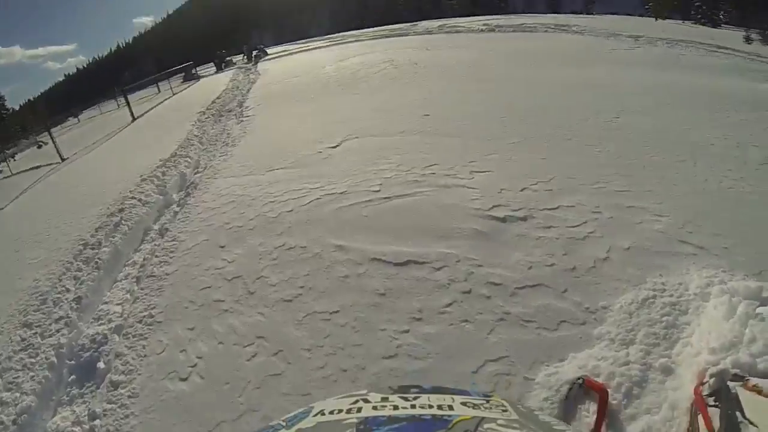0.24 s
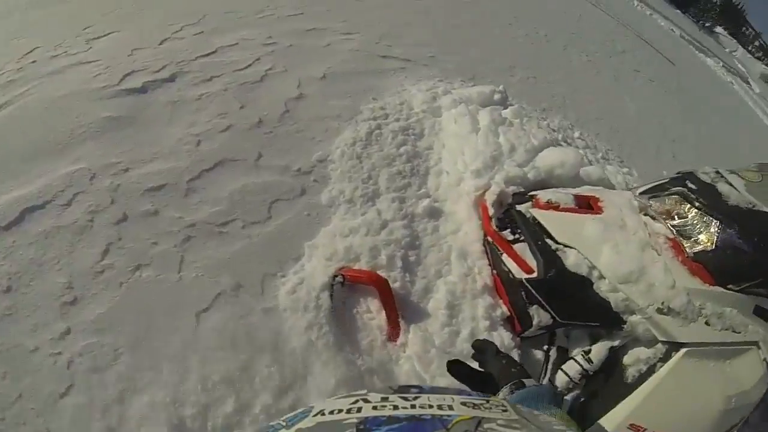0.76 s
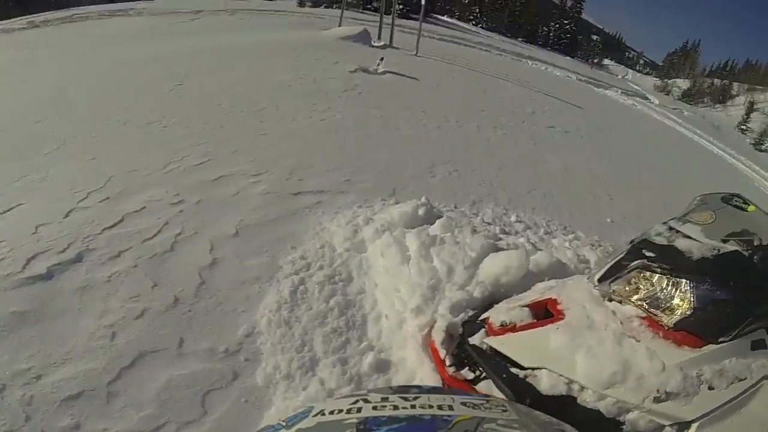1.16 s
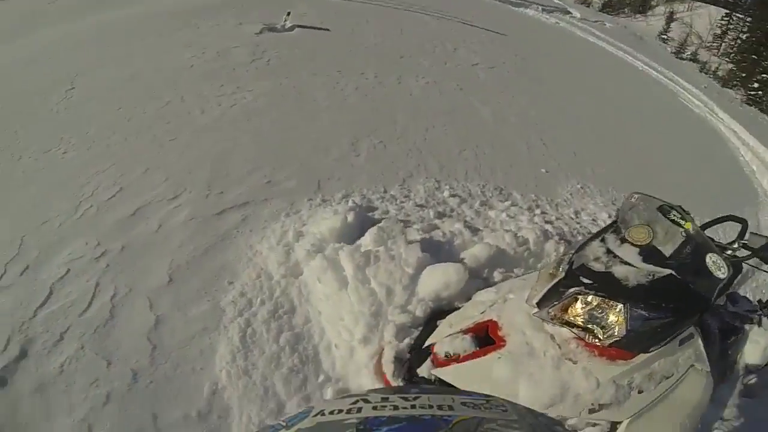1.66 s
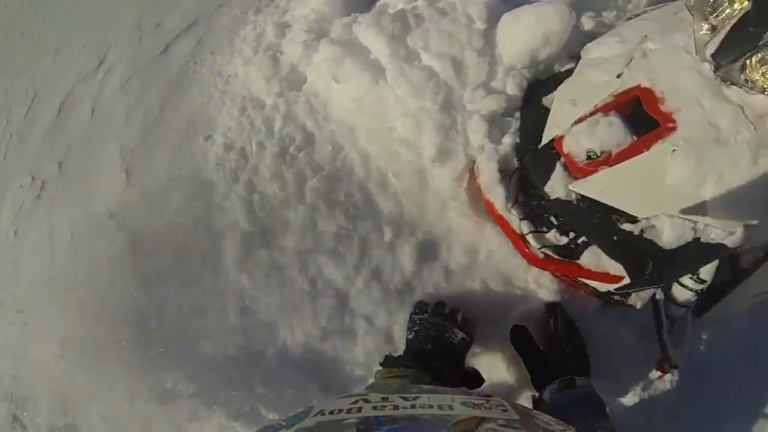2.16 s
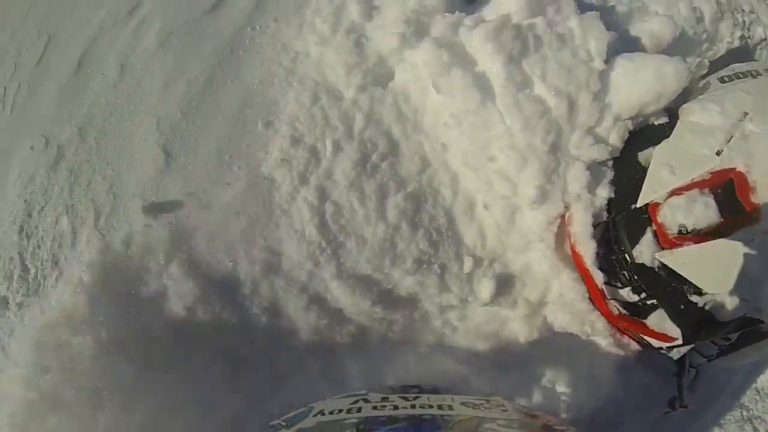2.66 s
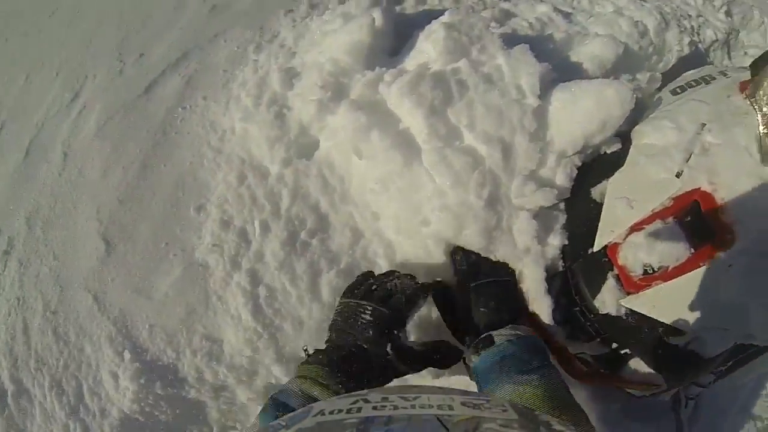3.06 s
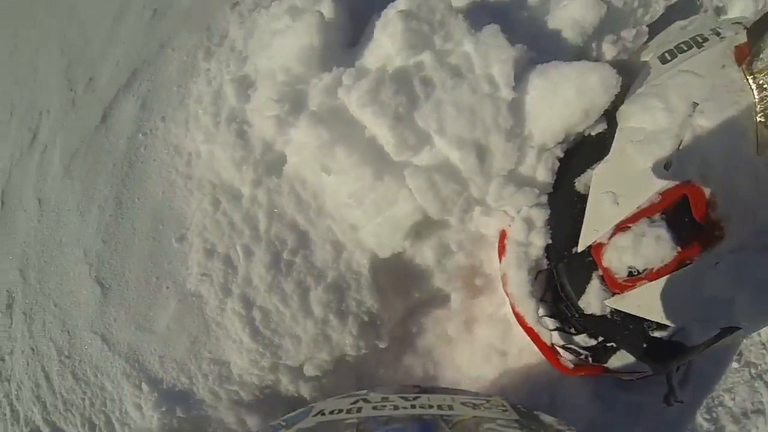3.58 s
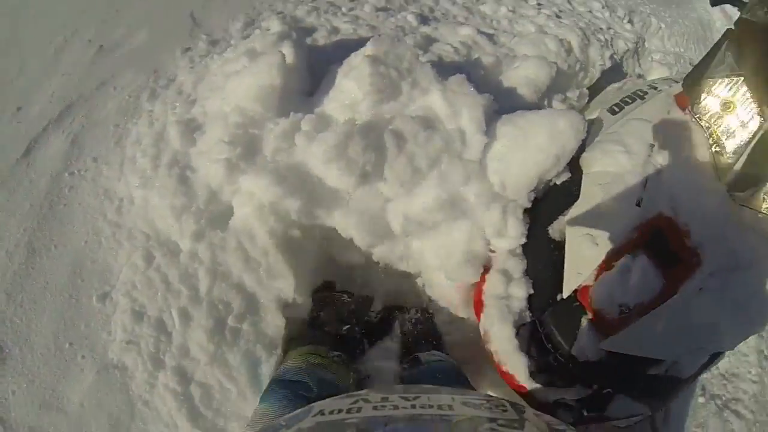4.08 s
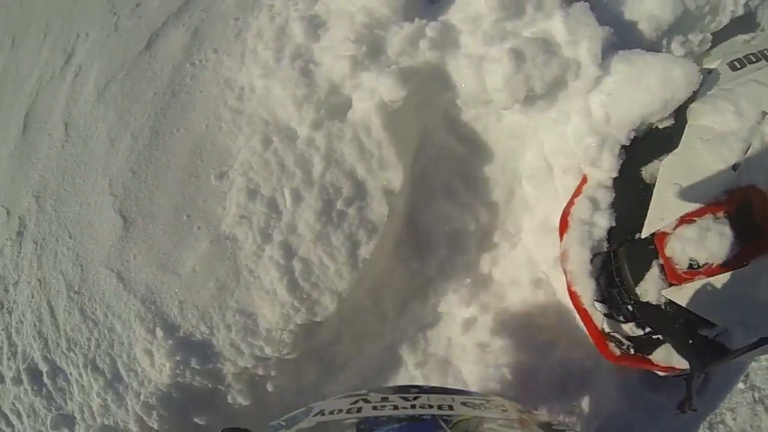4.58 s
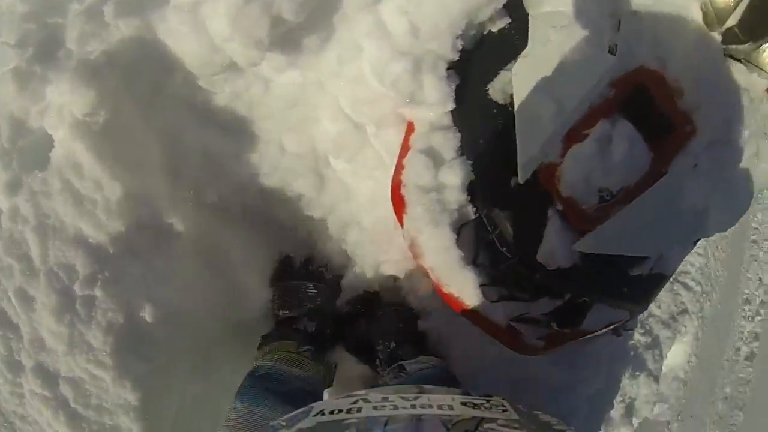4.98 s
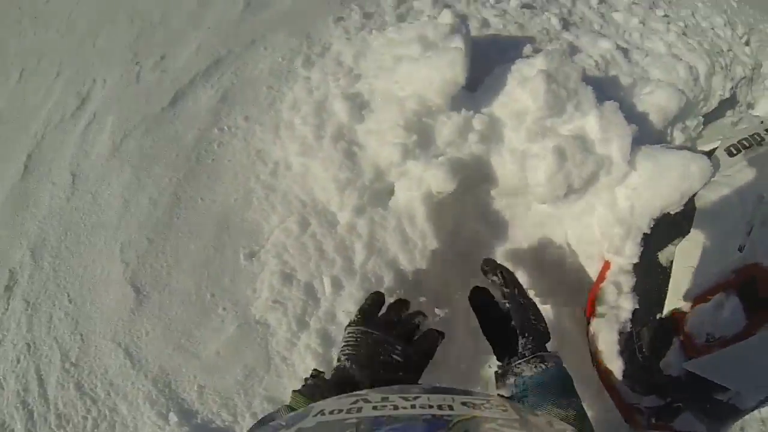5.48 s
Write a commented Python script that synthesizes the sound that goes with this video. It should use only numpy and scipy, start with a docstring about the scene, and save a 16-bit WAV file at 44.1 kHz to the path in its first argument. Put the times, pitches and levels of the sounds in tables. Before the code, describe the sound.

A snowmobile engine is running close by outdoors, its pitch falling from the start until it settles at about 2 seconds into a low, pulsing idle with light clatter and ticking. It idles on to the end. Gloved hands scoop snow beside it in short, grainy, crunching scrapes, first at about 0.6 and 1 second, then in a nearly continuous run of strokes from 2 seconds to about 5.6. Small snaps and clicks fall in between, around 1.7, 2.6, 3.2 and 4.8 seconds. The microphone is inside a closed case on a helmet, which makes everything boxy and adds an uneven low rumble of head movement. Dull, booming bumps hit the case, strongest near 0.6 and 2.5 seconds, with more around 2, 4 and 4.8 seconds. A faint, thin, high buzzing whine sits behind it all.

```python
"""Out in the snow, a two-cylinder snowmobile engine falls back to idle while gloved hands scoop beside it.
Each firing pulses the exhaust pipe, rings the covers and sets off clatter, knock and ticks.
The snow crunches in clumps of breaking grains; short snaps come in between. The microphone sits in a
closed case on a helmet: it booms near 115 Hz when jolted, rumbles with head movement, favours 1.5 kHz
and picks up a thin whine that switches on 50 times a second."""
import sys
import numpy as np
from scipy.fft import rfft, irfft, next_fast_len
from scipy.io import wavfile
from scipy.ndimage import uniform_filter1d, map_coordinates

SR = 44100
rng = np.random.default_rng(int(sys.argv[2]) if len(sys.argv) > 2 else 0)


def file_out(sig):
    """Save sig as 16-bit WAV at sys.argv[1]."""
    # one column per channel
    cols = np.atleast_2d(sig).T
    # limit, then scale
    lim = np.clip(cols, -1, 1)
    pcm = np.round(lim * 32767).astype(np.int16)
    wavfile.write(sys.argv[1], SR, pcm)


N = 253134

# engine speed (time [s], firing rate [Hz])
FIRING_RATE = [(0.0, 73.45), (.15, 67.04), (.3, 61.37), (.45, 59.46), (.6, 55.21), (.83, 51.15),
               (1.05, 47.35), (1.41, 42.22), (1.65, 40.04), (2.09, 38.25), (2.6, 37.55), (2.95, 38.76),
               (3.45, 37.13), (3.75, 38.96), (4.4, 37.97), (4.65, 38.8), (4.83, 36.7), (5.0, 39.2),
               (5.74, 38.1)]
# relative engine levels as the head turns and bends
# (time [s], exhaust [dB], upper harmonics [dB], clatter [dB], cover ring [dB], tick [dB])
ENGINE_LEVELS = [(0.0, -48.5, -35, -47, -53, -69), (0.34, -48.5, -61, -44, -56.5, -67),
                 (0.56, -52, -54, -46.5, -53, -60), (0.78, -51, -59, -50, -59.5, -65),
                 (1.28, -50.5, -59.5, -55.5, -55.5, -66), (1.65, -49, -61.5, -54, -56.5, -67),
                 (2.01, -48, -57.5, -51.5, -57, -62.5), (2.5, -52.5, -55.5, -51, -63, -59),
                 (3.01, -48, -54, -48.5, -59, -63.5), (3.45, -50.5, -52, -55, -62, -59),
                 (3.7, -48, -52.5, -49.5, -58, -62.5), (4.3, -48.5, -54, -48.5, -63, -61.5),
                 (4.68, -50, -51.5, -49, -62, -61.5), (5.12, -45, -50.5, -49.5, -69, -56),
                 (5.4, -47.5, -51, -49.5, -68, -62.5), (5.74, -55, -59, -51.5, -53, -63)]
# exhaust at idle, above idle, and its upper harmonics (frequency [Hz], gain [dB])
PIPE_IDLE_EQ = [(25, -19), (38, -4), (57, 8.5), (77, -19), (100, 3.5), (115, 0), (128, 5.5), (153, -6.5),
                (190, -10.5), (230, -10.5), (270, -7), (305, -18.5), (345, -28.5), (400, -33.5)]
PIPE_REV_EQ = [(35, -2), (60, 5), (110, -4.5), (140, -4), (185, 5.5), (215, 1.5), (285, -5), (350, -16),
               (430, -11.5), (490, -23), (600, -71)]
PIPE_UPPER_EQ = [(330, -25.5), (380, -7), (425, 5.5), (465, -3), (545, 2), (580, 2), (640, -8), (750, -24),
                 (890, -11), (1000, -46.5)]
# cover resonances (frequency [Hz], gain [dB])
COVER_EQ = [(1100, -44), (1300, -14), (1430, -1), (1570, 0), (1720, -15), (1870, -10), (2050, -20),
            (2260, -7), (2450, -28), (3000, -55)]
# engine noise bands (frequency [Hz], gain [dB])
DRONE_EQ = [(180, -41.5), (300, -9.5), (356, -16), (484, -15), (544, -14.5), (662, -13.5), (767, -23.5),
            (862, -16), (968, -28.5), (1150, -17.5), (1300, -45), (1690, -43), (2860, -120)]
CLATTER_EQ = [(950, -31.5), (1150, -10.5), (1300, -7.5), (1450, -2), (1580, -6.5), (1720, -6), (1870, -2.5),
              (2050, -10.5), (2260, -4), (2450, -17), (2900, -19.5), (3500, -32), (4200, -37)]
KNOCK_EQ = [(1530, -20), (2600, 7.5), (3710, 5.5), (4200, 9), (4920, 5), (5530, -7), (6270, 1.5),
            (8160, -6), (9180, -2.5), (10200, -25), (12100, -12), (12500, -21), (16200, -70), (22000, -120)]
TICK_EQ = [(2700, -10), (3200, 2), (4200, -7), (4850, 5), (5500, -7.5), (6500, -6.5), (7500, -14),
           (8200, -27)]
FIZZ_EQ = [(6500, -10), (7500, -1), (8400, -9.5), (9100, -4), (10000, -10), (11000, -5.5), (11500, -13.5),
           (12200, -11), (13500, -12.5), (14200, -42), (15200, -9), (15500, -29)]
# case rumble and boom under head movement (time [s], level [dB])
RUMBLE_LEVELS = [(0.0, -53), (0.21, -22), (0.25, -32), (1.09, -40.5), (1.18, -27.5), (1.66, -39),
                 (1.82, -29), (2.08, -36), (2.94, -34), (3.04, -42), (3.44, -25.5), (3.5, -34.5),
                 (3.95, -39.5), (4.0, -25), (4.6, -36), (5.55, -34), (5.68, -24.5), (5.74, -47)]
BOOM_LEVELS = [(0.0, -38), (0.19, -42.5), (0.35, -42.5), (0.83, -41.5), (1.28, -45), (1.45, -50.5),
               (1.61, -39), (1.82, -39), (2.38, -41), (2.7, -37.5), (2.99, -39.5), (3.42, -40.5),
               (3.95, -45), (4.22, -36.5), (4.72, -44), (4.95, -35.5), (5.29, -49.5), (5.74, -38.5)]
# case rumble and boom spectra (frequency [Hz], gain [dB])
RUMBLE_EQ = [(3, -3), (20, 0), (30, -6.5), (48, -13), (62, -30)]
BOOM_EQ = [(45, -48.5), (60, -4), (85, -2), (115, 7), (150, -0.5), (175, -12.5), (300, -17), (400, -42.5)]
# whine partials (frequency [Hz], level [dB])
WHINE_PARTIALS = [(6450, -57.5), (12900, -68)]
# single snaps (time [s], relative level [dB], centre [Hz], width [oct], t60 [s])
SNAP_EVENTS = [(0.271, -50, 9000, 0.41, 0.023), (1.673, -44, 4000, 1.3, 0.015),
               (1.686, -39, 500, 1.4, 0.019), (1.779, -44.5, 4500, 1.4, 0.02),
               (1.784, -45, 447, 0.83, 0.018), (2.563, -33, 1570, 0.32, 0.051),
               (2.671, -48, 1800, 0.73, 0.038), (2.8, -47, 485, 1.08, 0.057),
               (3.131, -38.5, 9100, 0.29, 0.017), (3.154, -32.5, 1560, 0.28, 0.028),
               (3.212, -35, 1530, 0.28, 0.027), (4.814, -36, 1530, 0.22, 0.043), (2.62, -51, 5000, 1, .06),
               (2.69, -53, 4500, 0.61, 0.037), (3.195, -50, 5000, 1.6, 0.061),
               (3.53, -53, 3280, 1.1, 0.084), (3.901, -49, 2930, 0.4, 0.073),
               (4.43, -51, 3500, 0.73, 0.062), (4.812, -48, 4500, 1.1, .04)]
# jolts of the case (time [s], level [dB], pitch [Hz], rise [s], t60 [s])
CASE_JOLTS = [(0.356, -30.5, 107.4, 0.0089, 0.23), (0.576, -19, 101, 0.0075, 0.13),
              (1.805, -25.5, 111.6, 0.044, 0.05), (2.019, -26, 106, 0.011, 0.059),
              (2.542, -18.5, 115, 0.01, 0.093), (2.633, -25, 122.8, 0.01, 0.29),
              (2.678, -23.5, 118, 0.018, 0.084), (2.796, -33, 132, 0.015, 0.071),
              (3.465, -30, 114.6, 0.031, 0.19), (3.998, -25, 127.3, 0.0087, 0.14),
              (4.01, -27.5, 75, 0.02, 0.12), (4.375, -26, 105.6, 0.0136, 0.064),
              (4.75, -24, 136.3, 0.027, 0.17), (4.866, -23, 98, 0.015, 0.11),
              (4.95, -32.5, 133, 0.013, 0.096), (5.32, -42, 113, 0.025, 0.13)]
# glove strokes going into and out of the snow, relative levels (start [s], length [s], level in [dB],
# level out [dB], rise [s], fall [s], brightness in [dB], brightness out [dB])
GLOVE_STROKES = [(0.557, 0.21, -42.5, -50.5, 0.054, 0.077, 1.5, 3),
                 (0.965, 0.19, -44.5, -47, 0.11, 0.063, 1.5, -0.5),
                 (1.952, 0.28, -54.5, -48.5, 0.033, 0.013, 4, 0),
                 (2.378, .33, -46, -41.5, 0.039, 0.02, -1, 1.5),
                 (2.908, 0.33, -52.5, -46, 0.028, 0.057, -2, 5),
                 (3.264, 0.37, -49, -47.5, 0.012, 0.08, -3, 2),
                 (3.808, 0.18, -43.5, -49, 0.095, 0.043, -1, -4),
                 (3.95, 0.13, -49, -46, 0.044, 0.028, -4, 0), (4.229, 0.11, -44, -49, .035, .03, -2, 0),
                 (4.302, .19, -48, -45, 0.044, 0.052, 0, 1),
                 (4.704, 0.153, -46, -43, 0.082, 0.024, -7, 2.5),
                 (4.838, 0.13, -44.5, -47.5, 0.018, 0.055, -9, -12),
                 (5.013, 0.33, -69, -57, 0.046, 0.046, 3, 7), (5.508, .11, -46, -46, 0.06, 0.017, -1, -4)]
# snow bands: main crunch, crust, fine crystals, low packing noise (frequency [Hz], gain [dB])
SNOW_EQ = [(800, -28), (1050, -24), (1250, -13), (1450, 1), (1560, 2), (1750, -8), (2100, -25), (2600, -30)]
CRUST_EQ = [(1500, -21.5), (1800, 1), (2000, -3.5), (2300, -2.5), (2550, -11), (3200, -11), (3700, -22.5)]
CRYSTAL_EQ = [(2300, -52), (2900, 2), (5000, -7), (8000, -13), (11000, -20), (15500, -45)]
PACK_EQ = [(150, -2.5), (220, -13), (300, -11.5), (400, -8.5), (510, -12), (610, -19.5), (700, -4.5),
           (780, -18), (880, -6.5), (1000, -39.5)]


def amp(db):
    return 10 ** (np.asarray(db) / 20)


def unit(x):
    return x / np.sqrt(np.mean(x ** 2) + 1e-20)


def curves(rows):
    """Per-sample curve for each column after time."""
    times_s, *columns = np.transpose(rows)
    return [np.interp(np.arange(N) / SR, times_s, column) for column in columns]


def wobble(rate_hz):
    """Smooth random curve, knots at rate_hz."""
    knots = rng.standard_normal(int(N * rate_hz / SR) + 4)
    return map_coordinates(knots, [np.arange(N) * rate_hz / SR])


def coloured(x, eq):
    """Minimum-phase filter; output rms 1."""
    size = 2 * next_fast_len(N // 2 + SR // 2)
    hz, db = np.transpose(eq)
    log_bins = np.log(np.fft.rfftfreq(size, 1 / SR) + 1)
    gain_db = np.interp(log_bins, np.log([1, *hz, hz[-1] * 1.3]), [db[0] - 60, *db, db[-1] - 60])
    cepstrum = irfft(np.log(amp(gain_db)), size)
    cepstrum[1:size // 2] *= 2
    cepstrum[size // 2 + 1:] = 0
    return unit(irfft(rfft(x, size) * np.exp(rfft(cepstrum)), size)[:N])


def cycle_starts(phase):
    return np.flatnonzero(np.diff(np.floor(phase))) + 1


def exhaust(phase, rate_hz, revs, exhaust_db, upper_db):
    """One pulse down the pipe per firing; brighter above idle."""
    at = cycle_starts(phase - .62)
    force = amp(.5 * rng.standard_normal(N // 100)[:len(at)])
    pulses = np.zeros(N)
    pulses[at] = force / rate_hz[at]  # equal harmonic level at any speed
    pipe = (1 - revs) * coloured(pulses, PIPE_IDLE_EQ) + revs * amp(-1) * coloured(pulses, PIPE_REV_EQ)
    return amp(exhaust_db + 8) * pipe + amp(upper_db - 9 - 12 * revs) * coloured(pulses, PIPE_UPPER_EQ)


def cover_ring(phase, uneven_db):
    """Covers take one tap per firing and bounce three times; play in the mounts scatters time and force."""
    at = cycle_starts(phase)
    jitter, scatter = rng.standard_normal((N // 100, 2))[:len(at)].T
    delay_samples = 30 + np.clip(12 * jitter, -30, 30).astype(int)
    cylinder_db = uneven_db * (np.floor(phase) % 2 - .5)
    first = at + delay_samples
    taps = np.zeros(N + SR)
    taps[first] = amp(cylinder_db[at] + 1.4 * scatter)
    for gap_samples in rng.integers(60, 480, (N // 100, 3))[:len(first)].T:
        taps[first + gap_samples] += .6 * taps[first]
    return coloured(taps[:N], COVER_EQ)


def impacts(phase, rate_hz, eq, floor, rise_s, decay_s, uneven_db):
    """Pistons and injectors: noise flares once per firing, weaker on one cylinder."""
    firing = np.floor(phase).astype(int)
    age_s = phase % 1 / rate_hz
    scatter_db = 2.2 * rng.standard_normal(N // 100)[firing + 9]
    force = amp(uneven_db * (firing % 2 - 1) + scatter_db)
    flare = force * np.exp(-age_s / decay_s) * (1 - np.exp(-age_s / rise_s))
    return coloured((floor + flare) * rng.standard_normal(N), eq)


def engine(mount_hz=58.2, mount_width_hz=5.8):
    """Parts sound at their own crank angles over a drone; more uneven through the mount resonance."""
    rate_hz, = curves(FIRING_RATE)
    exhaust_db, upper_db, clatter_db, ring_db, tick_db = curves(ENGINE_LEVELS)
    revs = np.clip((rate_hz - 41) / 14, 0, 1)
    uneven_db = 0.5 + 11 * np.exp(-((rate_hz - mount_hz) / mount_width_hz) ** 2)
    phase = np.cumsum(rate_hz) / SR  # one cycle per firing
    cover_phase = phase + .97 - .03 * rate_hz  # covers lag by a constant time
    pipe = exhaust(phase, rate_hz, revs, exhaust_db, upper_db)
    ring = cover_ring(cover_phase, uneven_db)
    drone = coloured(rng.standard_normal(N), DRONE_EQ)
    clatter = impacts(cover_phase, rate_hz, CLATTER_EQ, floor=0.7 - 0.31 * revs,
                      rise_s=0.0007, decay_s=0.014 - 0.0028 * revs, uneven_db=uneven_db)
    knock = impacts(cover_phase - 0.046, rate_hz, KNOCK_EQ,
                    floor=0.15, rise_s=0.00038, decay_s=0.0043, uneven_db=9)
    tick = impacts(phase - 0.565, rate_hz, TICK_EQ,
                   floor=0.63, rise_s=0.00032, decay_s=0.0085, uneven_db=3.5)
    fizz = impacts(phase - 0.75, rate_hz, FIZZ_EQ,
                   floor=0.39, rise_s=0.0015, decay_s=0.0051, uneven_db=.1)
    return (pipe + amp(ring_db) * ring
            + amp(-58.5 + 0.39 * (upper_db + 50)) * drone
            + amp(clatter_db - 3.4) * clatter
            + amp(-59.5 + 0.3 * (rate_hz - 64.5)) * knock
            + amp(tick_db + 2) * tick
            + amp(-69.5 + 0.71 * (tick_db + 65)) * fizz)


def head_movement():
    """Head movement rumbles, soft-limited, and keeps the case booming."""
    rumble_db, = curves(RUMBLE_LEVELS)
    boom_db, = curves(BOOM_LEVELS)
    sway_db = 1.1 * wobble(7)
    rumble = unit(np.tanh(0.49 * coloured(rng.standard_normal(N), RUMBLE_EQ)))
    boom = coloured(amp(2.4 * wobble(14)) * rng.standard_normal(N), BOOM_EQ)
    return amp(rumble_db + sway_db) * rumble + amp(boom_db) * boom


def whine(switch_hz=50, on_phase=.41, off_phase=.79):
    """Tone and octave in even bursts; phase slips from burst to burst."""
    t = np.arange(N) / SR
    cycles = t * switch_hz
    is_on = (cycles % 1 > on_phase) & (cycles % 1 < off_phase)
    gate = uniform_filter1d(is_on.astype(float), size=24)
    burst = cycles.astype(int)
    slip_rad = 1.9 * rng.standard_normal((burst[-1] + 1, len(WHINE_PARTIALS)))[burst]
    return gate * sum(amp(db) * np.sin(2 * np.pi * hz * t + slip_rad[:, k])
                      for k, (hz, db) in enumerate(WHINE_PARTIALS))


def snaps(rise_s=0.00049):
    """Clicks with noise dying behind them, each in its own band."""
    out, t = np.zeros(N + SR), np.arange(4096) / SR
    hz = np.fft.rfftfreq(len(t), 1 / SR) + 1
    for start_s, db, centre_hz, width_oct, t60_s in SNAP_EVENTS:
        band = np.exp(-2 * (np.log2(hz / centre_hz) / width_oct) ** 2)
        click = np.roll(irfft(band), 40)
        noise = unit(irfft(rfft(rng.standard_normal(len(t))) * band))
        envelope = amp(db - 60 * t / t60_s) * (1 - np.exp(-t / rise_s))
        out[round(start_s * SR):][:len(t)] += envelope * (noise + 1.9 * click / click.max())
    return out[:N]


def case_jolts(mode_hz=295, mode_db=-23.5):
    """Each jolt briefly rings the case and a higher mode of its mount."""
    out, t = np.zeros(N + SR), np.arange(SR // 2) / SR
    for start_s, db, hz, rise_s, t60_s in CASE_JOLTS:
        attack = np.sin(np.pi / 2 * np.clip(t / rise_s, 0, 1)) ** 2
        decay = amp(-60 * np.clip(t - rise_s, 0, 1) / t60_s)
        modes = np.sin(2 * np.pi * hz * t) + amp(mode_db) * np.sin(2 * np.pi * mode_hz * t)
        out[round(start_s * SR):][:len(t)] += amp(db) * attack * decay * modes
    return out[:N]


def glove_strokes(edge_db=16):
    """Scrape gain and brightness: each stroke rises, drags and falls; the loudest one leads."""
    t = np.arange(N) / SR
    scrape, bright_db = np.zeros(N), np.zeros(N)
    for start_s, length_s, in_db, out_db, rise_s, fall_s, *bright_ends_db in GLOVE_STROKES:
        end_s = start_s + length_s
        ramp = np.maximum(1 - (t - start_s) / rise_s, 1 - (end_s - t) / fall_s)
        fade_db = edge_db * np.clip(ramp, 0, 2) ** 2
        gain = amp(np.interp(t, [start_s + rise_s, end_s - fall_s], [in_db, out_db]) - fade_db)
        tilt_db = np.interp(t, [start_s, end_s], bright_ends_db)
        tilt_db += 0.24 * np.minimum(fade_db, edge_db)  # quiet edges are brighter
        bright_db = np.where(gain > scrape, tilt_db, bright_db)
        scrape = np.maximum(scrape, gain)
    return scrape, bright_db


def grains(rate_hz, spread_db):
    """Breaking grains: random clicks of scattered size."""
    hit = rng.random(N) < rate_hz / SR
    return unit(hit * rng.standard_normal(N) * amp(spread_db * rng.exponential(size=N)))


def snow_scooping():
    """Dense grains over a hiss, clumped as the crust gives way under the glove."""
    scrape, bright_db = glove_strokes()
    clump_db = 1.93 * wobble(45)
    crunch = 0.82 * rng.standard_normal(N) + .5 * grains(rate_hz=1100, spread_db=2.5)
    body = coloured(amp(clump_db) * crunch, SNOW_EQ)
    crust = coloured(amp(0.19 * clump_db + 1.2 * wobble(55)) * crunch, CRUST_EQ)
    crystals = coloured(amp(.5 * clump_db + 0.22 * wobble(70)) * crunch, CRYSTAL_EQ)
    pack = coloured(amp(0.88 * wobble(30)) * rng.standard_normal(N), PACK_EQ)
    return scrape * (amp(-2.5) * body + amp(-3.5 + 0.16 * bright_db) * crust
                     + amp(-12.5 + bright_db) * crystals + amp(-10.5) * pack)


def scene():
    return (engine() + snow_scooping() + snaps() + head_movement() + case_jolts() + whine())[None]


def record(dry):
    """Brick-wall low-pass."""
    cutoff_hz = 15550
    size = next_fast_len(N + SR // 2)
    passband = np.fft.rfftfreq(size, 1 / SR) < cutoff_hz
    return irfft(rfft(dry, size) * passband, size)[..., :N]


dry = scene()
out = record(dry)
file_out(out)
```